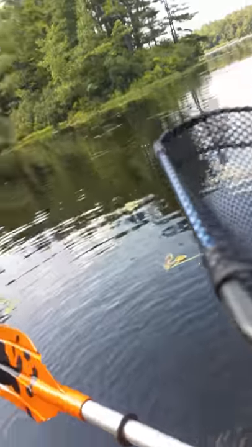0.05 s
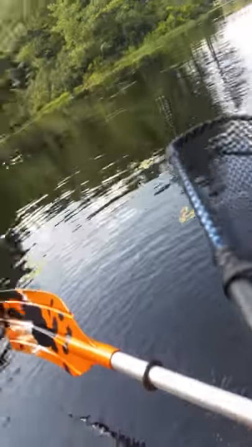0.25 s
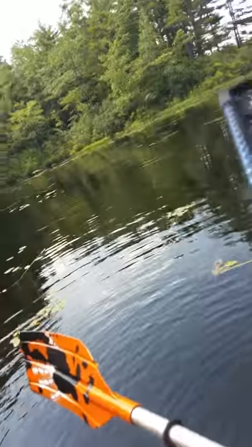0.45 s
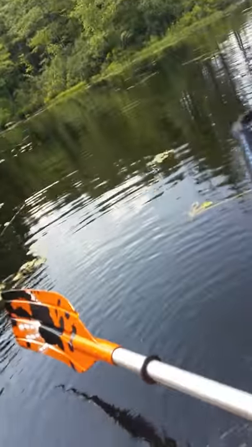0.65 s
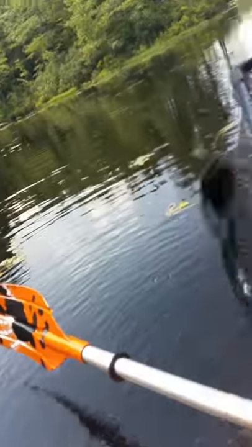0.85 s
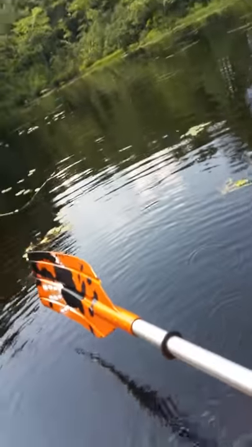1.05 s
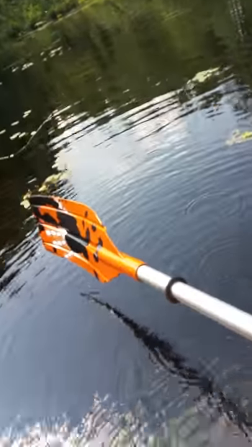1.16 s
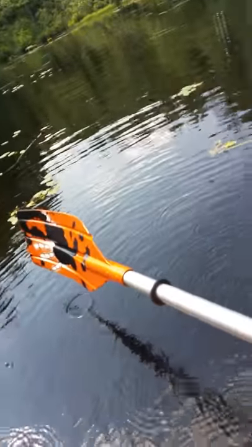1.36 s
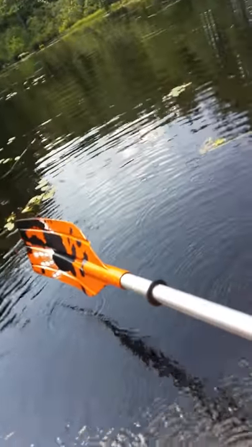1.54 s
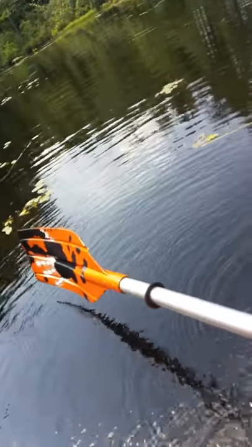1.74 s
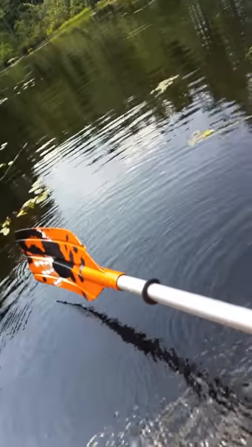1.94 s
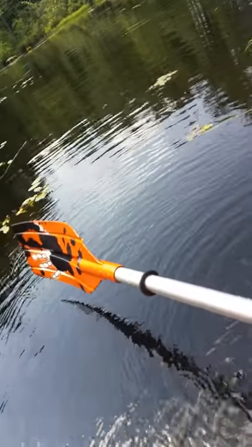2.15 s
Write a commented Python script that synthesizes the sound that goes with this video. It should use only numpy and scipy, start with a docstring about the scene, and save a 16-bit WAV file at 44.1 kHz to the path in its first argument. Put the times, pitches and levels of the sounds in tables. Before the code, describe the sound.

Clacks and hollow thumps of a fishing net being stowed in a kayak on calm water.

```python
"""A landing net is stowed in a plastic kayak on a still pond, close by.
A wavelet laps the side in quiet open air and the mesh starts to slide. The net's frame clacks against
gear and thumps the hollow hull, while mesh and fabric scrape and snap. Lighter knocks follow, and taps
set the hollow handle ringing briefly. As the rustle fades, small waves lap again, bubbles ring
and a few drops tick on the water."""
import sys
import numpy as np
from scipy import signal
from scipy.io import wavfile

SR = 44100
rng = np.random.default_rng(int(sys.argv[2]) if len(sys.argv) > 2 else 0)


def int16_out(signal):
    """Quantize to a 16-bit WAV file."""
    q = np.round(np.clip(np.atleast_2d(signal).T, -1, 1) * 32767)
    wavfile.write(sys.argv[1], SR, q.astype(np.int16))


N = 97020

# Dull tone of laps and rattling gear. Each row: frequency in Hz, gain in dB.
DULL_EQ = [(60, -9.5), (380, 6), (680, 0), (850, -7), (1100, -8.5), (1700, -13), (3200, -23.5), (8000, -35)]
# Bright tone of drips and fabric scrapes. Each row: frequency in Hz, gain in dB.
BRIGHT_EQ = [(300, 3), (2900, 4), (4000, -0.5), (10000, 1), (13000, 9), (16000, -1)]


def amp(db):
    """Decibels to gain."""
    return 10 ** (np.asarray(db) / 20)


def unit(x):
    """Scales to rms 1."""
    return x / np.sqrt(np.mean(x ** 2) + 1e-20)


def add(mix, start, sound):
    """Mixes a sound in at a start time in seconds."""
    part = mix[..., max(round(start * SR), 0):][..., :sound.shape[-1]]
    part += sound[..., :part.shape[-1]]


def colour(x, eq):
    """Minimum-phase EQ of unit energy, shaped by (Hz, dB) points."""
    hz, db = np.transpose(eq)
    log_bins = np.log(abs(np.fft.fftfreq(4096, 1 / SR)) + 1)
    gain = unit(amp(np.interp(log_bins, np.log(hz), db)))
    spectrum = np.exp(signal.hilbert(np.log(gain)).conj())
    impulse = np.fft.ifft(spectrum).real
    return signal.fftconvolve(x, impulse[None], axes=1)[:, :N]


def stereo_noise(size, mono):
    """White noise, from wide (mono=0) to centred (mono=1)."""
    left, other = rng.standard_normal((2, size))
    return np.array([left, mono * left + np.sqrt(1 - mono ** 2) * other])


def pan(db):
    """Left and right gains; positive dB leans left."""
    return amp([[db / 2], [-db / 2]])


def late_left(x, delay):
    """Sound from the right reaches the left side a delay in seconds later."""
    return np.array([np.pad(x[0], (round(delay * SR), 0))[:N], x[1]])


def burst(rise, t60, mono):
    """Noise that swells and dies away; times in seconds."""
    t = np.arange(SR // 2) / SR
    return stereo_noise(len(t), mono) * np.minimum(t / rise, 1) * amp(-60 * t / t60)


def ring(force, modes):
    """A force excites a body's decaying modes."""
    t = np.arange(SR // 2) / SR
    body = sum(amp(db - 60 * t / t60) * np.cos(2 * np.pi * hz * t) for hz, db, t60 in modes)
    return signal.fftconvolve(force, body)[:N]


def friction(size, mono, spread_db):
    """Noise made of tiny slips of uneven strength, 16 samples each."""
    slips = amp(spread_db * np.minimum(rng.exponential(1, size // 16 + 1), 4))
    return unit(stereo_noise(size, mono) * np.repeat(slips, 16)[:size])


def pond_air(level_db=-62, split_hz=1200):
    """A bed of quiet open air: a centred low murmur under wide, faint hiss."""
    # Each row: frequency in Hz, gain in dB.
    air_eq = [(25, -28), (94, -6), (180, -12.5), (400, -9.5), (850, -19), (2590, -27.5), (8000, -39.5),
              (15800, -31)]
    murmur = signal.lfilter(*signal.butter(1, split_hz, fs=SR), stereo_noise(N, mono=0.92))
    hiss = signal.lfilter(*signal.butter(1, split_hz, "high", fs=SR), stereo_noise(N, mono=0.033))
    return amp(level_db) * colour(murmur + hiss, air_eq) * pan(db=-1.5)


def water(drip_t60=0.0098, bubble_t60=0.028):
    """Wavelets slap the hull, drips tick on the surface and small bubbles ring, rising in pitch."""
    # Each row: start in seconds, level in dB, decay (t60) in seconds.
    lap_cues = [(0.0, -49, 0.39), (1.352, -49.5, 0.19), (1.521, -54, 0.2), (1.894, -58, 0.14)]
    # Each row: start in seconds, level in dB.
    drip_cues = [(.970, -45), (1.741, -52), (1.945, -45.5), (2.015, -51.5), (2.095, -51.5), (2.103, -53),
                 (2.135, -54), (2.175, -51)]
    # Each row: start in seconds, starting pitch in Hz, level in dB.
    bubble_cues = [(0.6347, 1158, -32), (.730, 2850, -43.5), (1.543, 1300, -53.5), (1.588, 1110, -53.5),
                   (1.945, 2590, -54.5)]
    laps, drips, bubbles = np.zeros((3, 2, N))
    for start, db, t60 in lap_cues:
        add(laps, start, amp(db) * burst(0.00069, t60, mono=0.63))
    for start, db in drip_cues:
        add(drips, start, amp(db) * burst(0.0011, drip_t60, mono=0.22))
    t = np.arange(SR // 10) / SR
    for start, hz, db in bubble_cues:
        chirp = np.sin(2 * np.pi * hz * t * (1 + t))
        add(bubbles, start, amp(db - 60 * t / bubble_t60) * chirp)
    return colour(laps, DULL_EQ) + colour(drips, BRIGHT_EQ) + bubbles


def mesh_slide(clump_db=2.0, clumps_per_s=110):
    """Mesh and clothing rustle as they slide in uneven clumps."""
    # Each row: time in seconds, level in dB.
    fader = [(0, -63), (.17, -53.5), (.44, -50), (0.499, -62.5), (0.648, -43), (.76, -49.5), (0.898, -53),
             (1.0, -53.5), (1.12, -47), (1.3, -60.5), (1.601, -82), (2.2, -64)]
    # Each row: frequency in Hz, gain in dB.
    rustle_eq = [(30, 15.5), (200, 14), (400, 19.5), (800, 5), (1300, 5.5), (4000, -6), (8500, -10),
                 (13000, -2.5)]
    t = np.arange(N) / SR
    clumps = np.interp(t * clumps_per_s, np.arange(SR), rng.standard_normal(SR))
    envelope = amp(np.interp(t, *np.transpose(fader)) + clump_db * clumps)
    return colour(envelope * friction(N, mono=0.36, spread_db=2.4), rustle_eq) * pan(db=-2.5)


def frame_clacks(strike_db=15):
    """The net's hoop strikes gear with a hard click and grinds on."""
    # Each row: start in seconds, level in dB, decay (t60) in seconds.
    clack_cues = [(0.181, -47.5, 0.12), (0.212, -36, 0.16), (.2312, -19.5, 0.024), (0.4252, -42, 0.029),
                  (.626, -41, 0.073), (.659, -39.5, 0.092), (0.6938, -38, 0.044), (0.739, -41, 0.045),
                  (0.805, -40.5, 0.015), (0.951, -44, 0.011), (1.175, -51, 0.14)]
    # Each row: frequency in Hz, gain in dB.
    clack_eq = [(100, -26), (550, -7), (880, -14), (1170, -1.5), (1450, -10.5), (1660, -9.5), (2050, -18),
                (3000, -19.5), (3600, -38), (16000, -32.5)]
    clacks = np.zeros((2, N))
    for start, db, t60 in clack_cues:
        add(clacks, start, amp([db + strike_db]))
        add(clacks, start, amp(db) * burst(0.00095, t60, mono=0.65))
    return colour(clacks, clack_eq) * pan(db=-2.5)


def fabric_scrapes():
    """Fabric catches close by in short, gritty scrapes."""
    # Each row: start in seconds, length in seconds, level in dB, pan to the left in dB.
    scrape_cues = [(0.183, 0.0092, -46.5, 1), (0.225, 0.02, -41.5, 6), (0.293, 0.012, -45.5, 3.5),
                   (0.384, 0.014, -43.5, 0), (0.409, .028, -47, -1), (0.556, 0.027, -47.5, -2),
                   (0.626, 0.021, -43, 0), (0.6954, 0.0082, -40, 8), (0.7208, 0.0085, -38, 6),
                   (0.73, 0.011, -34, 4), (0.788, 0.039, -53, 4), (0.836, 0.015, -48.5, -7),
                   (0.923, 0.018, -48, -1.5), (1.0197, 0.012, -49, -1)]
    scrapes = np.zeros((2, N))
    for start, length, db, side in scrape_cues:
        progress = np.linspace(0, 1, int(length * SR))
        envelope = np.minimum(10 * progress, 1) * np.sqrt(1 - progress)
        grit = friction(len(progress), mono=0, spread_db=3.5)
        add(scrapes, start, amp(db) * pan(side) * envelope * grit)
    return colour(scrapes, BRIGHT_EQ)


def hull_thumps(rattle_db=-16):
    """Each blow rings the hollow shell, makes the hull flex deeply and shakes loose gear."""
    # Each row: start in seconds, shell level in dB, contact time in ms, flex level in dB.
    blows = [(0.2279, -20.5, 2.18, -36), (0.2385, -18, 2.17, -32), (.2450, -29, 2.2, -58),
             (.283, -34, 1.85, -51), (.572, -46, 1.2, -46.5), (.586, -40.5, 0.91, -52),
             (.668, -36.5, 1.35, -50), (.695, -43.5, 1.1, -47), (0.871, -46, 0.82, -43.5),
             (0.927, -27.5, 2.33, -42), (.951, -34, 1.86, -40), (.992, -39, 3.1, -48),
             (1.207, -43.5, 3.8, -50.5), (1.366, -42, 4.2, -55.5)]
    # Each row: frequency in Hz, level in dB, decay (t60) in seconds.
    shell_modes = [(93.04, -20, 0.53), (109.4, -4.5, 0.094), (161, -17.5, 0.2), (239.5, -5, 0.14),
                   (302, -0.5, 0.042), (345, 0, 0.026), (365.3, -10.5, 0.13), (518, -5.5, 0.098),
                   (669, -3, 0.055)]
    # Each row: frequency in Hz, gain in dB.
    flex_eq = [(20, -32), (45, -3), (100, 1.5), (135, -4), (200, -3.5), (1000, -54.5)]
    force, flex, rattle = np.zeros(N), np.zeros((2, N)), np.zeros((2, N))
    t_ms = 1000 * np.arange(SR // 50) / SR
    for start, db, contact_ms, flex_db in blows:
        push = np.sin(np.pi * np.minimum(t_ms / contact_ms, 1)) ** 2  # longer contact, duller thump
        add(force, start, amp(db) * push / push.sum())
        add(flex, start, amp(flex_db) * burst(0.0046, t60=0.4, mono=1))
        add(rattle, start, amp(db + rattle_db) * burst(0.0013, t60=0.21, mono=0.58))
    return (ring(force, shell_modes) + colour(flex, flex_eq) + colour(rattle, DULL_EQ)) * pan(db=-2.5)


def mesh_snaps(shiver_db=-23):
    """Mesh and fittings snap free, each with one sharp click and a brief shiver."""
    # Each row: start in seconds, level in dB, pan to the left in dB.
    snap_cues = [(0.3519, -18, -16.5), (0.387, -23, -15.5), (0.4552, -28.5, -15), (0.4631, -17, -15.5),
                 (0.6946, -34, -2), (0.8052, -30, -13.5)]
    # Each row: frequency in Hz, gain in dB.
    snap_eq = [(200, -19), (900, 0.5), (2600, 0.5), (3600, -11.5), (5600, -3), (10000, -22.5), (16000, -18)]
    snaps = np.zeros((2, N))
    for start, db, side in snap_cues:
        add(snaps, start, amp(db) * pan(side))
        add(snaps, start, amp(db + shiver_db) * pan(side) * burst(0.00021, t60=0.025, mono=0.069))
    return colour(snaps, snap_eq)


def handle_taps(chatter_db=-11, contact_hz=4300):
    """Each tap chatters briefly on the hollow handle and sets it ringing."""
    # Each row: start in seconds, level in dB.
    tap_cues = [(0.8687, -47), (.896, -39.5), (1.093, -44.5), (1.283, -49.5), (1.351, -58.5)]
    # Each row: frequency in Hz, level in dB, decay (t60) in seconds.
    handle_modes = [(421.3, 3.5, 0.26), (649, -3, 0.073), (1156, -2, 0.064), (1395, -11, 0.079),
                    (1860, -3.5, 0.046), (2770, 0, 0.022), (3730, 8.5, 0.015)]
    force = np.zeros(N)
    for start, db in tap_cues:
        chatter = np.diff(burst(0.0038, t60=0.036, mono=1)[0])  # tilted towards the treble
        add(force, start, amp([db]))
        add(force, start, amp(db + chatter_db) * chatter)
    lowpass = signal.butter(2, contact_hz, fs=SR)
    return signal.lfilter(*lowpass, ring(force, handle_modes)) * pan(db=-2.5)


def scene():
    """Air and water lie all around, mesh and hull to the right, hoop and handle more ahead."""
    around = pond_air() + water()
    right = mesh_slide() + fabric_scrapes() + hull_thumps() + mesh_snaps()
    ahead = frame_clacks() + handle_taps()
    return around + late_left(right, delay=0.00029) + late_left(ahead, delay=0.00015)


def record(dry, cutoff_hz=15900):
    """A steep low-pass trims the very top of the treble."""
    lowpass = signal.firwin(511, cutoff_hz, window=("kaiser", 9), fs=SR)
    return signal.oaconvolve(dry, lowpass[None], "same")


dry = scene()
out = record(dry)
int16_out(out)
```